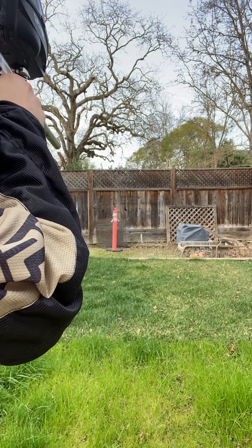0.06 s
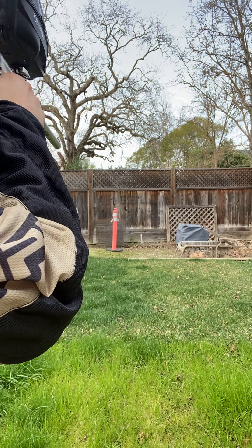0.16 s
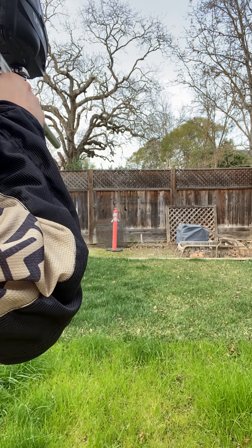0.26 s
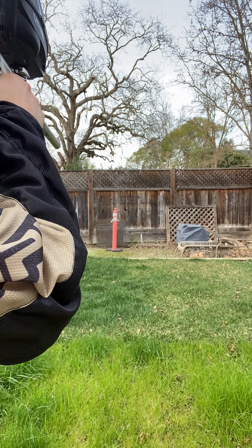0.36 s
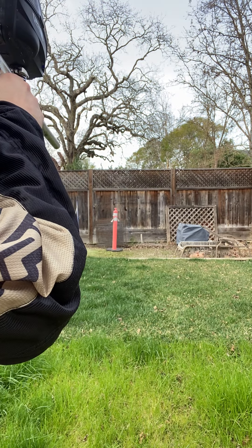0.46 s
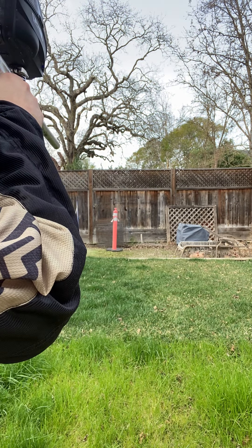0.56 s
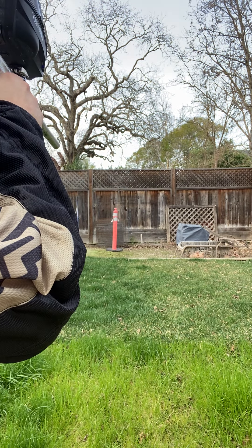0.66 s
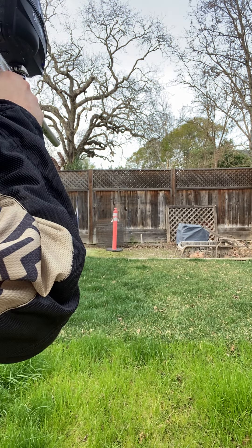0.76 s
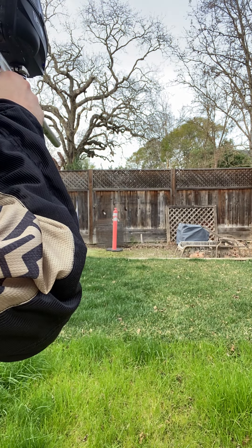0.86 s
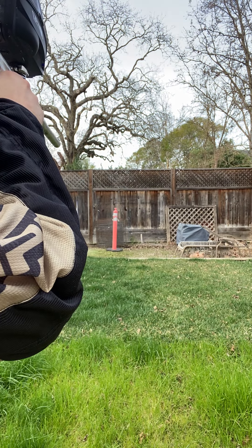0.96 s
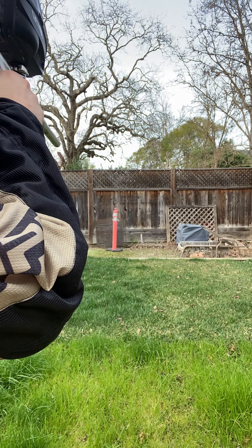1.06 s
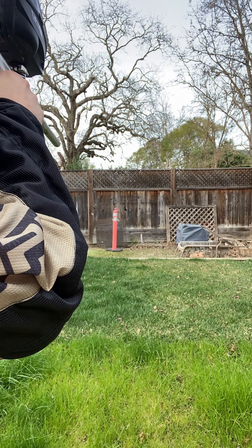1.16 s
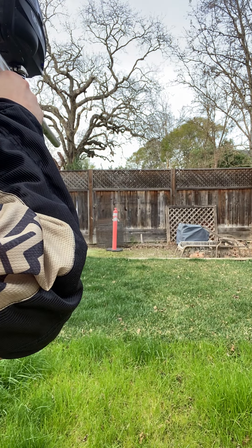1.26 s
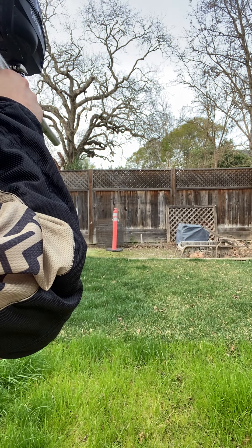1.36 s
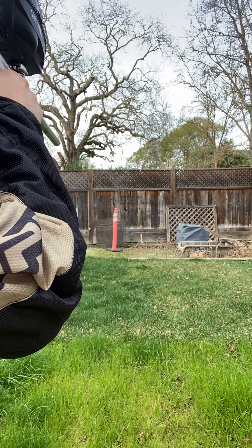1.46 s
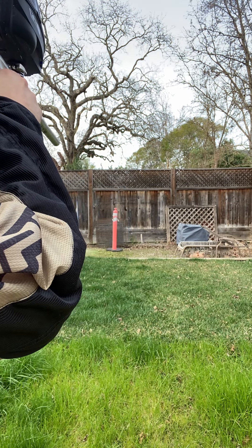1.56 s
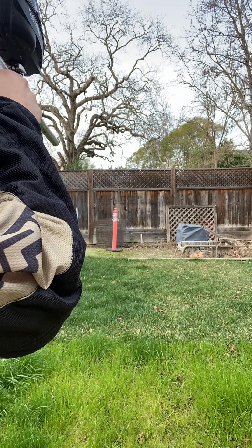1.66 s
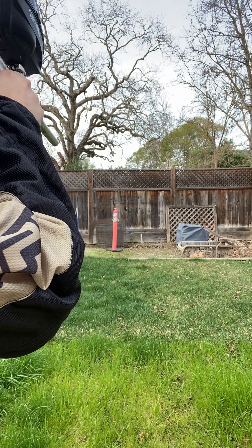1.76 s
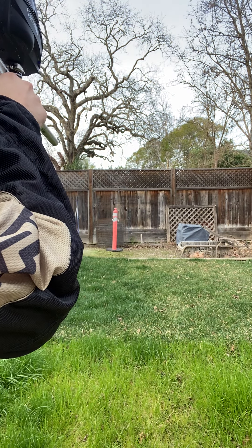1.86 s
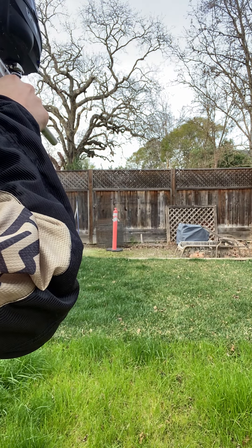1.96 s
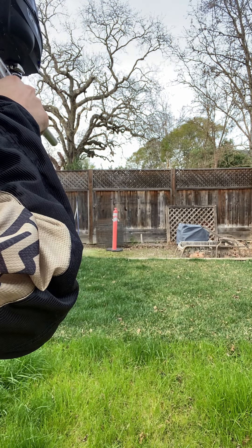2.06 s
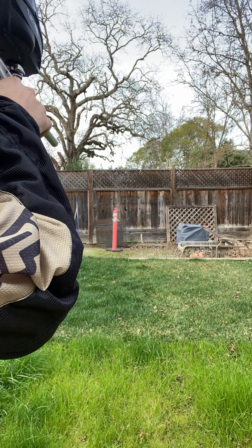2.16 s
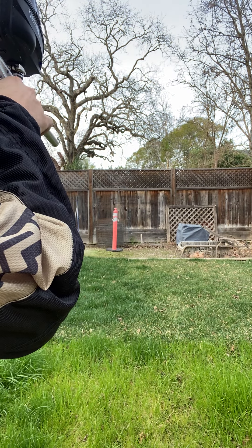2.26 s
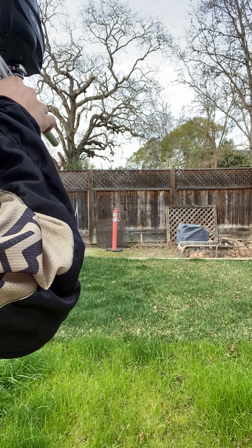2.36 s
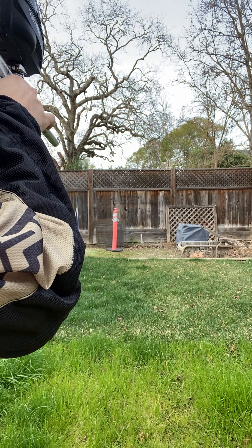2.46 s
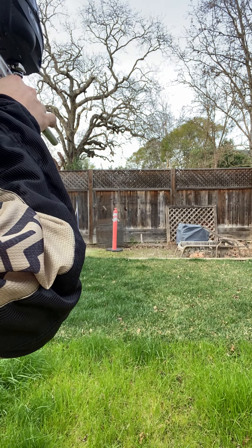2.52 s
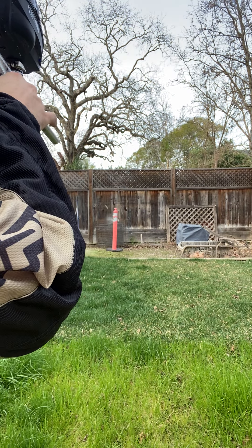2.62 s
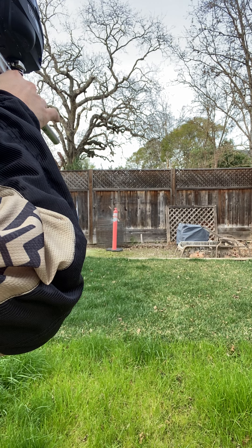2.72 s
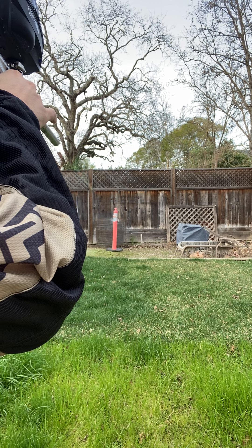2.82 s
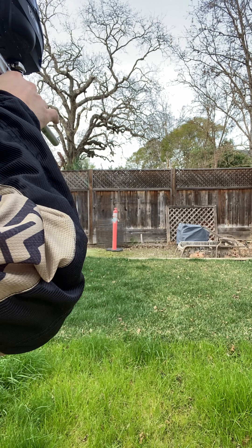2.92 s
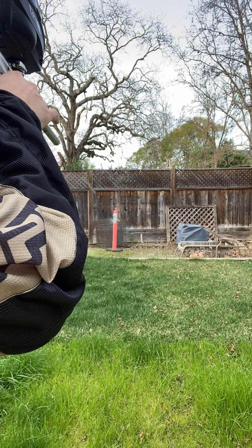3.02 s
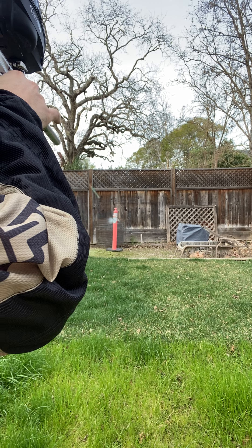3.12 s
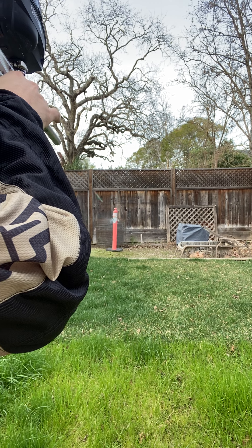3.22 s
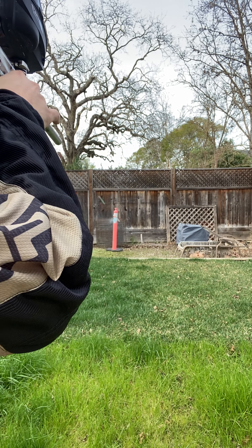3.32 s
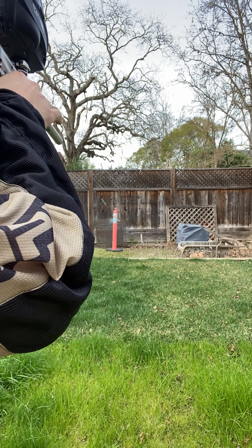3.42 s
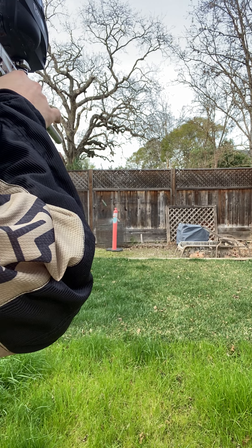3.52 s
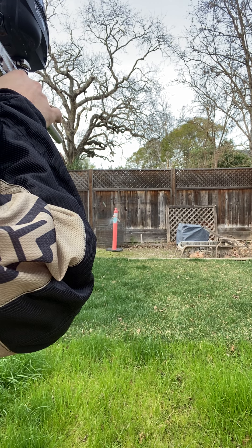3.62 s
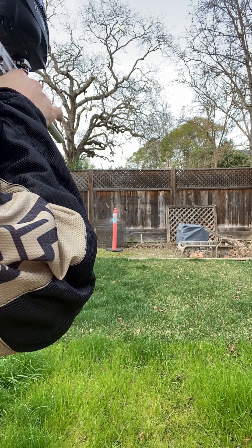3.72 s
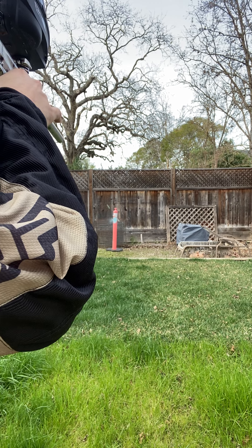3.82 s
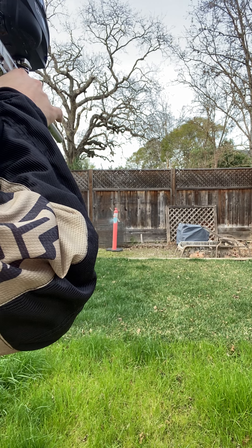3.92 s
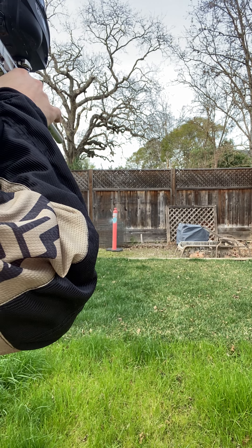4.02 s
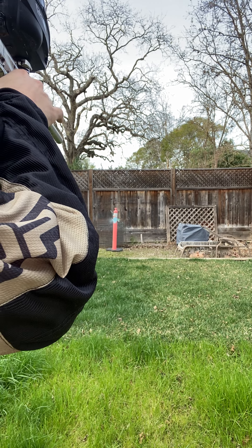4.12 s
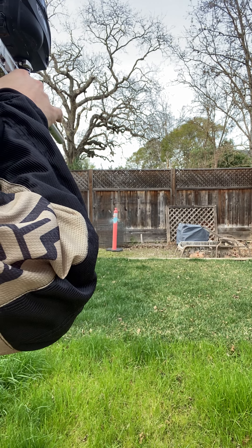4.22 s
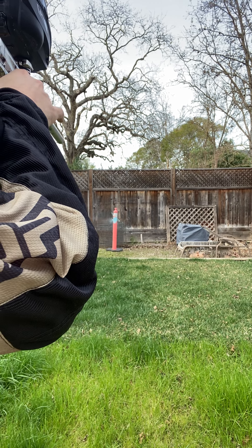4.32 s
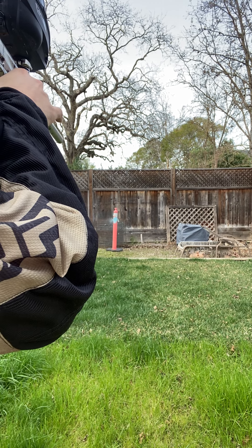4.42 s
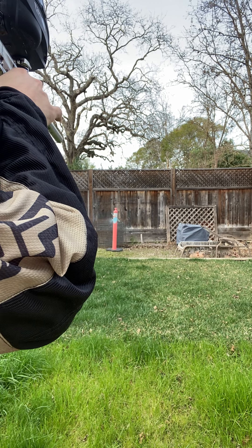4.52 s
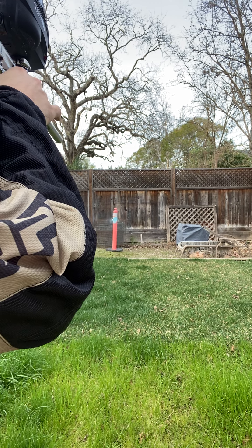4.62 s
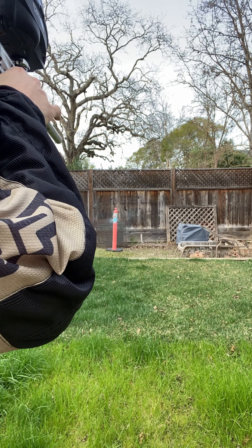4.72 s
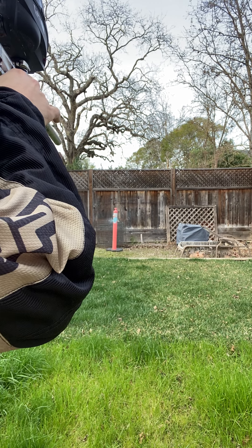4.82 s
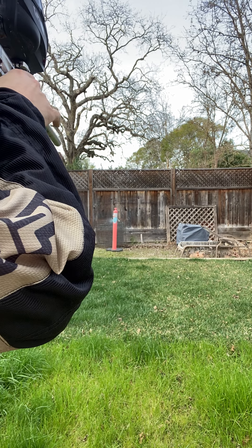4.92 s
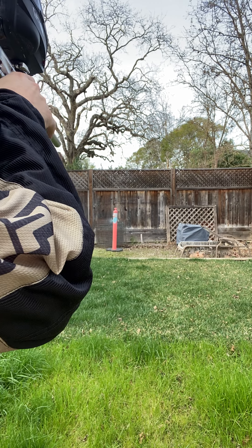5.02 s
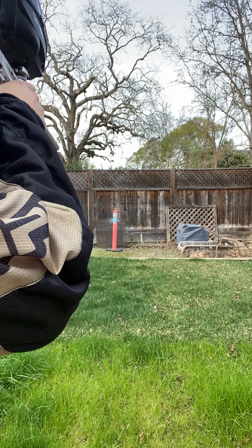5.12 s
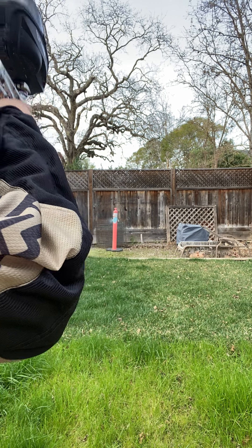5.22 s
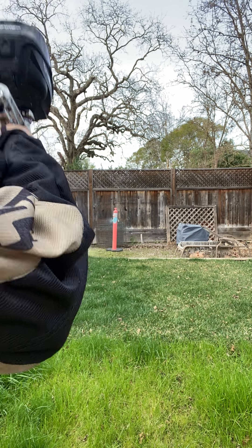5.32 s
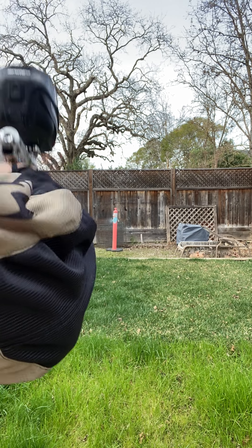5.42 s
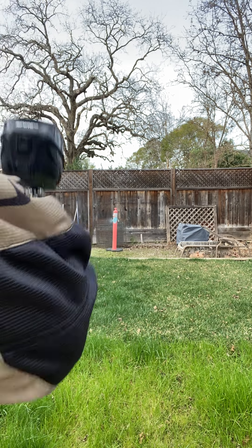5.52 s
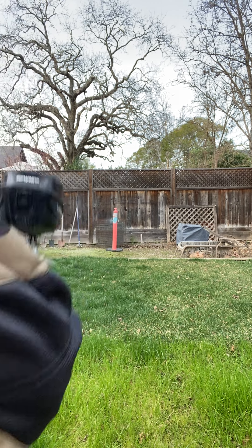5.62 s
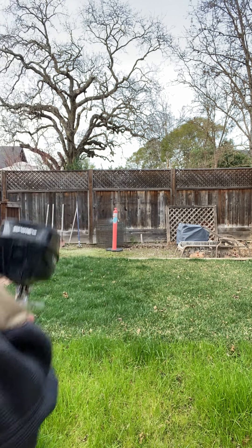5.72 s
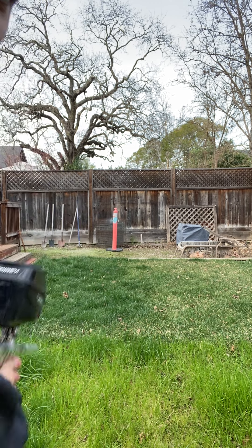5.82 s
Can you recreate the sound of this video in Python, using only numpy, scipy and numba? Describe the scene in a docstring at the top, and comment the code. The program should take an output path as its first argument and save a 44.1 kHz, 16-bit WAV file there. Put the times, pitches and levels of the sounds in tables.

```python
"""A paintball marker, right beside a phone, fires two single shots and a fast string on a fenced lawn.
Each shot is bolt click, gas pop and bolt return: noise clicks and air pushes through metal and barrel resonances.
The ball bursts on a far post a moment later: snaps, slap and thuds ring shell, post, boards and fence.
Both echo off fence and house and scatter around the yard in fading bands of noise.
Balls roll in the hopper and gear rustles as the marker is lowered; filtered noise is traffic, wind and hiss."""
import sys
import numpy as np
from scipy import signal
from scipy.fft import rfft, irfft, next_fast_len
from scipy.io import wavfile
from scipy.ndimage import uniform_filter1d
from numba import njit

SR = 44100
rng = np.random.default_rng(int(sys.argv[2]) if len(sys.argv) > 2 else 0)


def digitize_waveform(pressure):
    """Quantize a signal to 16-bit integers and store it at the path in sys.argv[1].

    Rows of a 2-D input are taken as channels; values are limited to [-1, 1].
    """
    field = np.atleast_2d(pressure).T
    bounded = np.clip(field, -1, 1)
    quanta = np.round(bounded * 32767).astype(np.int16)
    wavfile.write(sys.argv[1], SR, quanta)


N = 259087
SIZE = next_fast_len(N + SR)  # working length, leaving a second for tails
FREQ = np.arange(SIZE // 2 + 1) * SR / SIZE
BURST_LENGTH = 4096  # samples in every short sound, 93 ms
STRING_S = 2.7  # shots before this time behave as from rest; sagging levels count from here


def undb(db):
    """Amplitude factor for a level in dB."""
    return 10 ** (np.asarray(db) / 20)


def over_hz(table):
    """Read a (Hz, value) table at every frequency, straight in log frequency."""
    hz, value = np.transpose(table)
    return np.interp(np.log(FREQ + 1), np.log(hz + 1), value)


def over_time(rows, outside):
    """Read a (s, value) table at every sample, with one value outside its ends."""
    s, value = np.transpose(rows)
    return np.interp(np.arange(N) / SR, s, value, outside, outside)


def filtered(x, gain):
    """Shape the spectrum by a gain at every frequency."""
    return irfft(rfft(x, SIZE) * gain, SIZE)[..., :x.shape[-1]]


def ring(x, modes):
    """Sum of (Hz, width Hz, dB) resonances, each peaking at its dB; neighbours alternate in sign."""
    gain = 0
    for k, (hz, width, db) in enumerate(modes):
        detuning = (FREQ - hz ** 2 / (FREQ + 1)) / width
        gain = gain + (-1) ** k * undb(db) / (1 + 1j * detuning)
    return filtered(x, gain)


def add(track, s, sound):
    """Mix in at time s; the track is a ring, so times before zero lie at its end."""
    i = int(round(s * SR)) + np.arange(len(sound))
    track[i % SIZE] += sound


def burst(t60_ms, rise_ms=0.022):
    """Noise that flares and dies away by 60 dB in t60_ms, cut where the short sound ends."""
    ms = np.arange(BURST_LENGTH) / SR * 1000
    flare = 1 - np.exp(-ms / rise_ms)
    return rng.standard_normal(BURST_LENGTH) * flare * undb(-60 * ms / t60_ms)


def push(peak_ms):
    """One smooth shove of air, strongest after peak_ms."""
    x = np.arange(BURST_LENGTH) / SR * 1000 / peak_ms
    return x * np.exp(1 - x)


def apart():
    """Share of each frequency that differs between left and right, fading below and above a band."""
    low_hz, top_hz = 487, 5960
    return 1 / np.sqrt((1 + (low_hz / (FREQ + 1)) ** 6) * (1 + (FREQ / top_hz) ** 3))


def shots():
    """Trigger times as the bolt starts forward, and whether each shot acts as from rest."""
    # runs of fire: first_shot_s, last_shot_s
    runs = [(.7266, .7266), (1.325, 1.325), (2.5424, 2.7333), (2.8752, 2.8752), (2.9762, 3.4538),
            (3.5543, 4.7012)]
    period_s = .0956  # the marker's top rate of fire
    times = np.concatenate([np.linspace(a, b, round((b - a) / period_s) + 1) for a, b in runs])
    return times, times < STRING_S


def marker():
    """Bolt and gas run one cycle per shot: new noise clicks ring the metal, air pushes ring the barrel."""
    # steps of a firing cycle: delay_ms, click_db, click_t60_ms, brightness_db_per_octave, push_db, push_peak_ms
    cycle = [(0, -17.5, 12, -3, -18, 0.13), (14.16, -37, 37, -2, -36.5, 0.04),
             (15.62, -26.5, 24, 0, -15, 0.38), (18.753, -15, 3.7, 3.5, -12, 0.15),
             (21, -32.5, 110, 0, -25.5, 0.72), (30.26, -13.5, 2, 4.5, -40.5, 0.59),
             (33, -39, 6.2, 0.5, -32, 0.9)]
    # ringing of bolt and body: pitch_hz, width_hz, level_db
    metal_modes = [(1500, 650, 2.5), (2260, 990, 6), (4140, 480, 3.5), (6320, 1300, 2.5), (10330, 1400, 2),
                   (14000, 3500, -8)]
    # air column of barrel and breech: pitch_hz, width_hz, level_db
    barrel_modes = [(118, 94, 3.5), (378, 41, 3), (514, 31, 10.5), (664.6, 79, 4.5), (810, 190, 1.5),
                    (1320, 740, -13), (213, 75, -7)]
    settled_ms = 25  # from here on the bolt's return keeps strict time
    rest_slowness, exit_jitter_ms, step_jitter_ms = 1.05, .25, .12
    bolt_scatter_db, gas_scatter_db, pop_scatter_db, colour_scatter_db = 1.5, 1.0, 1.0, 1.6
    split_hz = 5200  # each click leans duller or brighter about this pitch

    times, rested = shots()
    into_string_s = times - STRING_S
    bolt_chance, gas_chance, exit_chance = rng.standard_normal((3, len(times)))
    # from rest the first click is softer but full-bodied; it softens and thins as the string goes on
    bolt_db = np.where(rested, -1.5, -1 * into_string_s) + bolt_scatter_db * bolt_chance
    body_db = np.where(rested, 3, -2.5 * into_string_s)
    # pressure drops a little in the string
    gas_db = np.where(rested, 0, -1.05 * into_string_s) + gas_scatter_db * gas_chance
    slowness = np.where(rested, rest_slowness, 1)

    hiss, gas = np.zeros((2, SIZE))
    for s in times:
        add(hiss, s, undb(-45.5) * burst(1500, rise_ms=1.2))  # gas vents all through the cycle
    metal = rfft(hiss)
    dull_share = 1 / (1 + (FREQ / split_hz) ** 4)
    octaves = np.log2(np.clip(FREQ, 1000, 12000) / 5000)
    for k, (ms, click_db, t60_ms, bright_db, push_db, peak_ms) in enumerate(cycle):
        first = k == 0
        low, high = np.zeros((2, SIZE))
        shift_ms = (0 < ms < settled_ms) * ((slowness - 1) * ms + exit_jitter_ms * exit_chance)
        starts = times + (ms + shift_ms) / 1000
        for s, bolt, body, pop in zip(starts, bolt_db, body_db, gas_db):
            change_db = bolt if first else bolt_scatter_db * rng.standard_normal()
            click = undb(click_db + change_db) * burst(t60_ms)
            lean_db = colour_scatter_db * rng.standard_normal()
            add(low, s, click * undb(first * body - lean_db))
            add(high, s, click * undb(lean_db))
            pop_s = s + step_jitter_ms / 1000 * rng.standard_normal()
            pop_peak_ms = peak_ms * undb(pop_scatter_db * rng.standard_normal())
            add(gas, pop_s, undb(push_db + (bolt if first else pop)) * push(pop_peak_ms))
        coloured = rfft(low) * dull_share + rfft(high) * (1 - dull_share)
        metal += coloured * undb(bright_db * octaves)
    return undb(15) * ring(irfft(metal, SIZE), metal_modes) + undb(19.5) * ring(gas, barrel_modes)


def bursts():
    """Balls burst far off: the shell snaps, paint sprays, the post slaps, boards thud and the fence booms."""
    # bursts on the target: start_s, shell_low_db, shell_middle_db, shell_high_db, slap_db, thud_db, boom_db
    hits = [(-0.016, -22.5, -13.5, -15.5, -13, -15.5, -12.5), (0.871, -24.5, -10, -10.5, -23.5, -29, -30),
            (1.471, -21.5, -16.5, -13.5, -10.5, -12, -13), (2.6938, -33.5, -12.5, -12, -30, -24.5, -28.5),
            (2.7916, -20.5, -15, -15.5, -12.5, -17, -18), (2.8839, -25.5, -13, -9.5, -9, -16.5, -9.5),
            (3.0267, -14.5, -10, -14, -9, -8.5, -9), (3.125, -15.5, -11.5, -13.5, -8.5, -14, -9),
            (3.224, -21, -22, -14.5, -26, -15.5, -27.5), (3.318, -22, -15, -15.5, -10, -21, -14.5),
            (3.4116, -16.5, -16.5, -17, -7.5, -14.5, -10), (3.5114, -26, -20, -18, -14.5, -14, -12),
            (3.606, -17, -21, -17, -9, -12, -16), (3.6997, -23.5, -16, -16.5, -8, -14.5, -12.5),
            (3.7984, -26, -30, -16, -35.5, -35, -27.5), (3.8919, -24, -17.5, -18, -10, -20.5, -18),
            (3.994, -26, -19, -21, -12, -15, -14.5), (4.0839, -23.5, -19.5, -17, -22, -33, -22),
            (4.179, -18.5, -16, -15, -11.5, -17, -14.5), (4.2772, -23.5, -28.5, -20.5, -12, -17.5, -21.5),
            (4.3757, -31.5, -22.5, -25.5, -16, -30, -18.5), (4.4652, -22.5, -18, -17, -10, -16.5, -18),
            (4.5629, -24.5, -15.5, -15.5, -9.5, -37, -20), (4.6601, -22.5, -18, -18, -14, -23, -23),
            (4.7562, -23.5, -26, -27, -20, -26.5, -25), (4.8529, -24.5, -18, -18.5, -14.5, -21.5, -21.5)]
    # low, middle and high ring of the shell, one list each: pitch_hz, width_hz, level_db
    shell_modes = [
        [(2420, 1100, 16.5)],
        [(3500, 2800, 10.5)],
        [(6600, 3300, 9), (10700, 6000, 4)],
    ]
    # ring of the post: pitch_hz, width_hz, level_db
    post_modes = [(490, 120, -7.5), (1008, 453, 7.5), (1870, 1520, 5)]
    # ring of the boards: pitch_hz, width_hz, level_db
    board_modes = [(302, 78, -4.5), (418, 140, -10)]
    # ring of the whole fence: pitch_hz, width_hz, level_db
    fence_modes = [(143, 44, -2)]
    tracks = np.zeros((6, SIZE))
    for s, *dbs in hits:
        spray = undb(-20.5) * burst(130, rise_ms=0.85)
        snap = undb(3.5) * push(0.036) + undb(-1.5) * burst(4.0) + spray
        slap = undb(4.5) * (push(0.22) + undb(-25.5) * burst(70.0))
        thud = undb(13.5) * (push(0.24) + undb(-5.0) * burst(110.0))
        for track, db, sound in zip(tracks, dbs, (snap, snap, snap, slap, thud, thud)):
            add(track, s, undb(db) * sound)
    bodies = [*shell_modes, post_modes, board_modes, fence_modes]
    return undb(8.5) * sum((-1) ** k * ring(tracks[k], modes) for k, modes in enumerate(bodies))


def echoed(x, echoes, dull_hz, thin_hz=0.98):
    """The sound and its copies off hard surfaces, duller above dull_hz and thinner below thin_hz."""
    copies = sum(undb(db) * np.exp(-2j * np.pi * FREQ * ms / 1000) for ms, db in echoes)
    dulling = (1 + 1j * FREQ / dull_hz) ** 2
    thinning = 1 - 1j * thin_hz / (FREQ + 1)
    return filtered(x, 1 + copies / dulling / thinning)


def beside(x, ms, db):
    """A source off to one side: a late copy adds on the left and takes away on the right."""
    side = filtered(x, undb(db) * apart() * np.exp(-2j * np.pi * FREQ * ms / 1000))
    return np.array([x + side, x - side])


def yard(x, count=3):
    """Scattered return of the yard: it builds over some 10 ms and fades band by band."""
    # scatter from fences, trees and houses: pitch_hz, t60_s, level_db
    scatter_bands = [(128, 0.37, -20.5), (285, 0.3, -17), (686, 0.6, -21.5), (1540, 0.57, -22.5),
                     (3160, 0.59, -28.5), (6530, 0.5, -34.5), (10300, 0.48, -39.5)]
    turn_s = 0.16  # pace at which a few noise tails take turns, keeping the scatter's colour even
    build_s = .005  # the first scatter needs a couple of metres of travel
    s = np.arange(SR) / SR
    turn = np.arange(SIZE) / SR / turn_s
    out = 0
    for k in range(count):
        tail = 0
        for hz, t60, db in scatter_bands:
            band_gain = 1 / (1 + ((FREQ - hz ** 2 / (FREQ + 1)) / hz) ** 2)
            tail = tail + filtered(rng.standard_normal((2, SR)), band_gain) * undb(db - 60 * s / t60)
        mid, side = rfft(tail * (1 - np.exp(-(s / build_s) ** 2)), SIZE)
        side = side * apart()
        # each tail takes its turn, fading in and out
        share = np.sqrt(2 / count) * np.cos(np.pi * (turn + k) / count)
        out = out + filtered(x * share, np.array([mid + side, mid - side]) / np.sqrt(2))
    return out


def hopper():
    """Gelatine balls knock on a plastic shell: a short hollow ring with a flare of noise, and a tick."""
    # single knocks and small ticks of gear: start_s, level_db, pitch_hz, treble_db
    single_knocks = [(0.715, -75, 1200, -28), (1.749, -59, 567, -24), (1.826, -41, 1240, -38),
                     (1.999, -71, 460, -47), (5.151, -67.5, 893, -54), (5.233, -72, 910, -57.5),
                     (5.268, -68, 904, -49), (5.524, -67, 504, -40), (5.564, -60, 914, -55),
                     (5.58, -60, 635, -45), (5.622, -52, 553, -56), (5.659, -47, 805, -45),
                     (5.678, -52, 520, -52), (5.712, -44, 980, -51), (5.734, -52.5, 617, -57.5),
                     (5.748, -49, 700, -58), (5.764, -59, 580, -52), (5.803, -55, 533, -62),
                     (5.849, -65, 556, -65.5), (5.864, -46, 1020, -51)]
    hollow, tick = np.zeros((2, SIZE))
    t = np.arange(BURST_LENGTH) / SR
    # a patter of chance knocks once the marker tips
    patter_from_s, patter_per_s = 5.6, 90
    length = N / SR - patter_from_s
    when, size, pitch = rng.random((3, int(patter_per_s * length)))
    patter = zip(patter_from_s + length * when, -61 + 6.8 * size, 650 * 2 ** (pitch - .5), -68 + 8.0 * size)
    for s, db, hz, tick_db in [*single_knocks, *patter]:
        tone = undb(-60 * t / 0.027) * np.sin(2 * np.pi * hz * t)
        add(hollow, s, undb(db) * (tone + 1.9 * burst(35.0, rise_ms=1.5)))
        add(tick, s, undb(tick_db) * burst(12.0))
    shell = ring(ring(hollow, [(527, 780, 12.0), (1040, 380, 2.8)]), [(800, 2000, 0)])
    return shell + ring(tick, [(2310, 500, 0.6), (4700, 870, -3.0)])


def rustle():
    """Sleeves and gear rustle as the arms come down: grainy noise in an airy and a dull band."""
    # rise and fall of the rustle: time_s, airy_db, dull_db
    rustle_levels = [(5.151, -90, -67), (5.237, -74, -92), (5.488, -68, -59), (5.618, -75, -56),
                     (5.78, -68, -58), (5.87, -90, -89)]
    s, airy_db, dull_db = np.transpose(rustle_levels)
    grain = undb(2.0 * uniform_filter1d(rng.standard_normal(N), size=300) * np.sqrt(300))
    airy = ring(grain * rng.standard_normal(N), [(6580, 4000, 1.6)])
    dull = ring(grain * rng.standard_normal(N), [(755, 360, 3.3)])
    airy = airy * undb(over_time(list(zip(s, airy_db)), -120))
    dull = dull * undb(over_time(list(zip(s, dull_db)), -120))
    return np.pad(airy + dull, (0, SIZE - N))


def diffuse(length):
    """Noise pair from all around: a shared part and a part that differs left and right."""
    mid, side = rng.standard_normal((2, length))
    side = filtered(side, apart())
    return np.array([mid + side, mid - side]) / np.sqrt(2)


def thin_hiss():
    """A thin hiss enters at 1.03 s and fades: narrow noise near 3.7 kHz on top of broad noise."""
    start_s, level_db, fade_db_per_s = 1.03, -51, -35
    narrow_band = [(3680, 450, 0)]
    thin = ring(ring(diffuse(N), narrow_band), narrow_band)
    broad = ring(diffuse(N), [(7000, 6000, 0)])
    hiss = thin / thin.std() + undb(-2) * broad / broad.std()
    t = np.arange(N) / SR
    return hiss * undb(level_db + fade_db_per_s * (t - start_s)) * (t > start_s)


def wind():
    """Light wind rumbles on the phone: narrow low noise whose level buffets at random."""
    # slow course of the wind: time_s, level_db
    wind_level = [(0, -53.5), (2.5, -52), (4.9, -53.5), (5.3, -66.5), (5.87, -61.5)]
    pitch_hz, gust_db, gust_ms = 59, 4.0, 40
    rumble = ring(ring(rng.standard_normal(N), [(pitch_hz, 60, 0)]), [(pitch_hz, 80, 0)])
    span = int(gust_ms * SR / 1000)
    gusts = uniform_filter1d(uniform_filter1d(rng.standard_normal(N), span), span)
    level_db = over_time(wind_level, -62) + gust_db * gusts / gusts.std()
    return rumble / rumble.std() * undb(level_db)


def bump():
    """One soft low bump: a brief 64 Hz wave under a bell-shaped envelope."""
    centre_s, width_ms = 2.307, 15
    t = np.arange(N) / SR - centre_s
    return undb(-31) * np.exp(-.5 * (t * 1000 / width_ms) ** 2) * np.cos(2 * np.pi * 64 * t)


def distant_traffic():
    """Traffic far off: noise from all around, shaped in pitch and slowly swelling."""
    # colour of the traffic: pitch_hz, relative_level_db
    town_colour = [(76, -39), (130, -9), (302, -15), (382, -11), (610, -15), (868, -10), (3560, -33.5),
                   (4080, -39), (7060, -45.5), (14000, -56.5)]
    # swell: time_s, change_db
    town_swell = [(0, 10), (2.5, 5), (5.2, -5), (5.87, 8)]
    town = filtered(diffuse(N), undb(over_hz(town_colour)))
    return town / town.std() * undb(-66.5 + over_time(town_swell, 0))


def scene():
    """Marker and handling close on one side, bursts farther off, then the yard and the air around."""
    # a burst arrives again via the ground and near boards: delay_ms, level_db
    hit_bounces = [(8.4, -1), (16.5, -11)]
    # its runs to and fro between fence and house: delay_ms, level_db
    hit_echoes = [(89, -15), (178, -21), (267, -33), (356, -44)]
    # echoes of the marker itself: delay_ms, level_db
    shot_echoes = [(50, -30), (74, -22), (165, -36)]
    near, far = marker(), bursts()
    # fences return little bass
    arrivals = echoed(echoed(far, hit_bounces, 10400), hit_echoes, dull_hz=4800, thin_hz=350)
    close = echoed(near, shot_echoes, 10000) + hopper() + rustle()
    direct = beside(close, ms=1.201, db=-6.0) + beside(arrivals, ms=2.2, db=-6.5)
    # the marker's bass leaves over the fence and hardly returns
    thinned = filtered(near, 1 / (1 - 1j * 445 / (FREQ + 1)) ** 2)
    scattered = yard(thinned + undb(5.5) * far) * undb(-13.5)
    return (direct + scattered)[:, :N] + thin_hiss() + wind() + bump() + distant_traffic()


@njit
def follow(size, attack, release):
    """Envelope that rises fast and falls slowly."""
    out, e = np.empty(len(size)), 0.
    for i in range(len(size)):
        e += (size[i] - e) * (attack if size[i] > e else release)
        out[i] = e
    return out


def record(dry):
    """Phone microphone: port mixing, late bass, a limiter shared by both channels, soft clipping, top cut."""
    # how the ports turn into left and right, in phase: pitch_hz, left_lead_rad
    port_lead = [(150, 0), (300, -.15), (500, -.6), (800, 1.2), (1100, .5), (1500, -2), (2500, -2.8),
                 (3700, -6.1), (5000, -6.9), (7000, -6.7), (8300, -7.2), (11800, -8.6), (16000, -9.3)]
    # and in level: pitch_hz, left_minus_right_db
    port_balance = [(400, 0), (620, -5), (1000, 3), (1300, 5), (1800, 0), (5000, 1), (12000, 0)]
    # the phone lets the bass through late: pitch_hz, delay_ms
    bass_lag = [(40, 13), (150, 9.5), (250, 6.5), (350, 3), (600, .6), (900, 0), (2000, 0)]
    low_hz, top_hz = 60, 16300
    limit_db, ratio, attack_ms, release_ms = -12.5, 2.21, 12.1, 380
    half = undb(over_hz(port_balance) / 2) * np.exp(.5j * over_hz(port_lead))
    # delay summed over frequency gives the phase
    lag = np.exp(-2j * np.pi * np.cumsum(over_hz(bass_lag)) / 1000 * SR / SIZE)
    low_cut = 1 / np.sqrt(1 + (low_hz / (FREQ + 1)) ** 8)
    late = filtered(dry, np.array([half, 1 / half]) * lag * low_cut)
    loudness = follow(np.abs(late).max(axis=0), 1000 / (attack_ms * SR), 1000 / (release_ms * SR))
    held = late * np.minimum(undb(limit_db) / (loudness + 1e-9), 1) ** (1 - 1 / ratio)
    top_cut = signal.ellip(10, .2, 80, top_hz, fs=SR, output="sos")
    return signal.sosfilt(top_cut, np.tanh(held))


dry = scene()
out = record(dry)
digitize_waveform(out)
```